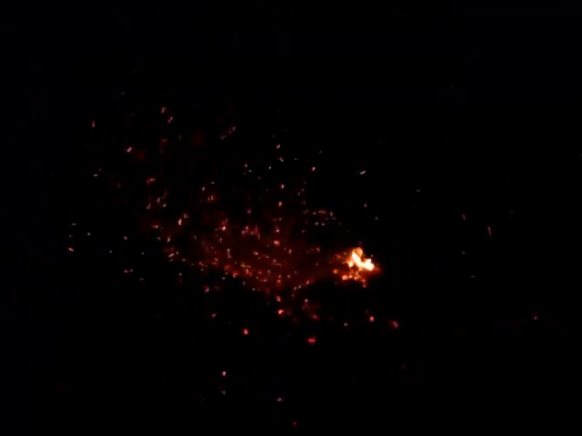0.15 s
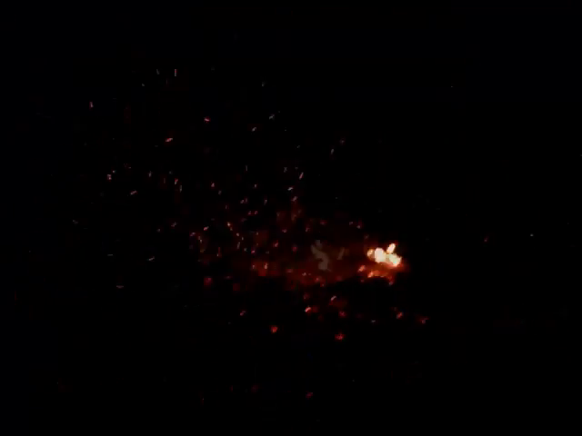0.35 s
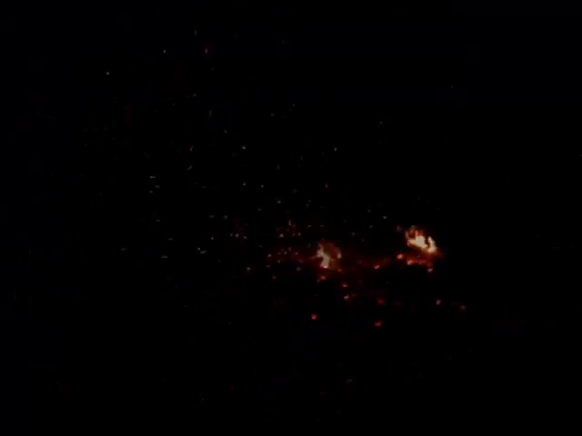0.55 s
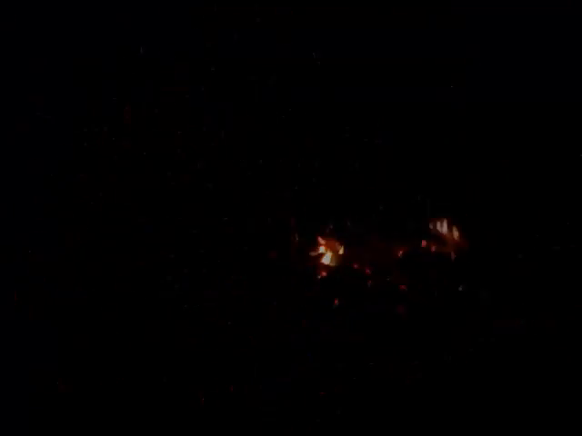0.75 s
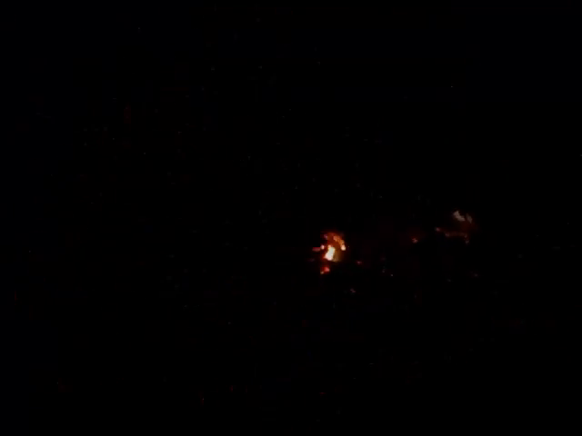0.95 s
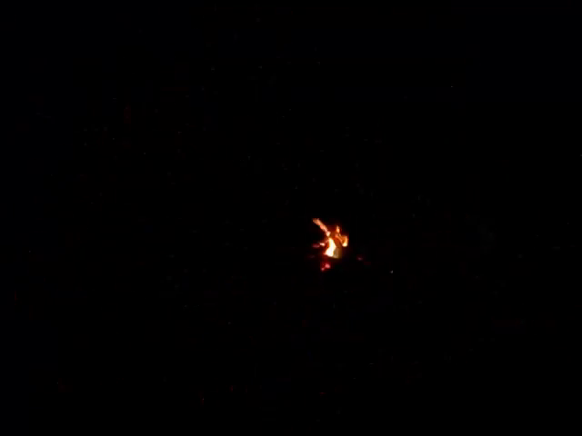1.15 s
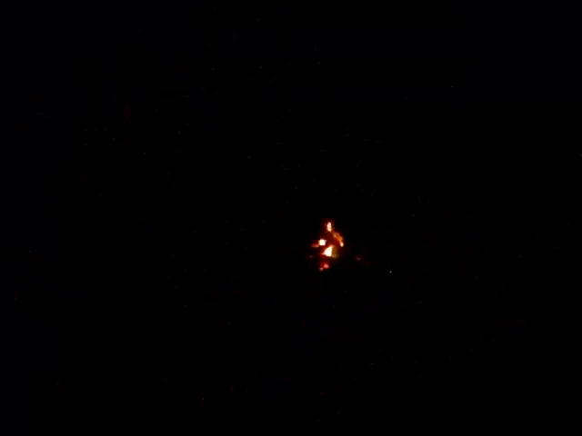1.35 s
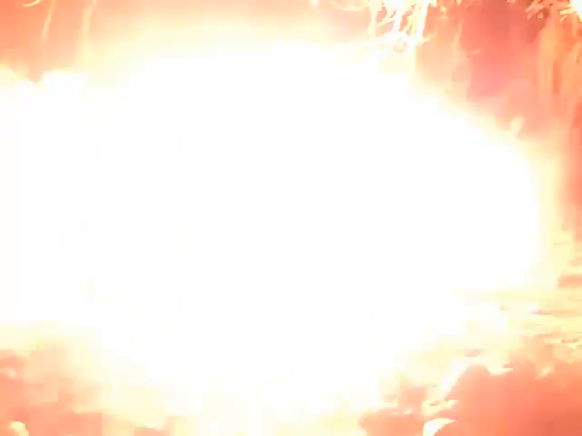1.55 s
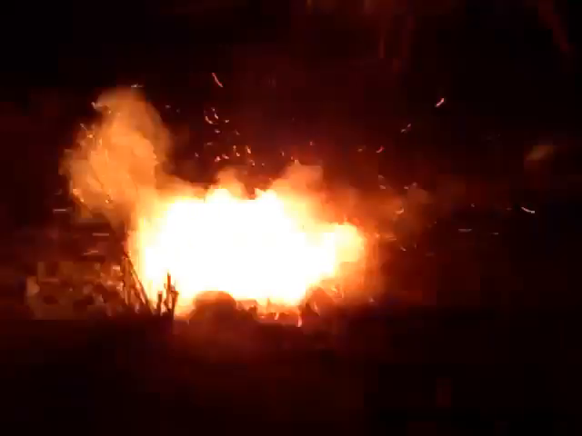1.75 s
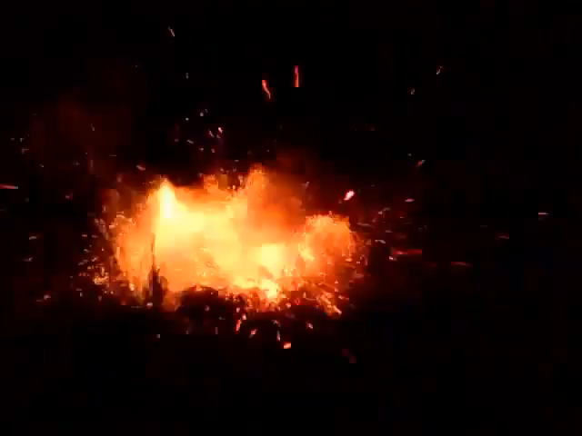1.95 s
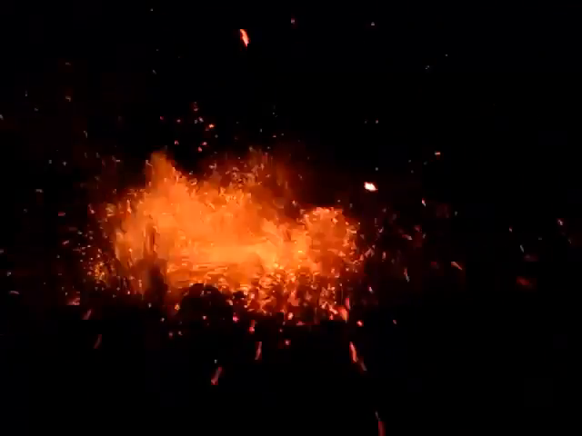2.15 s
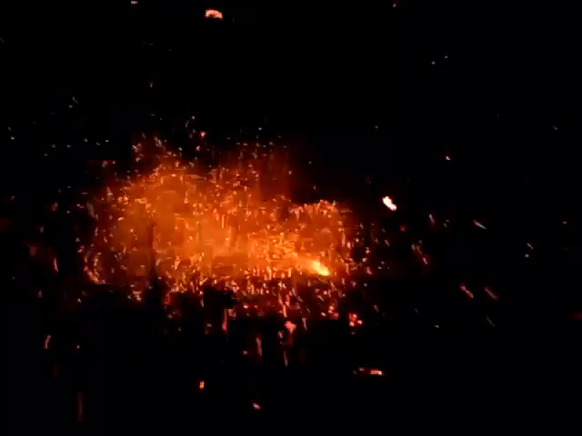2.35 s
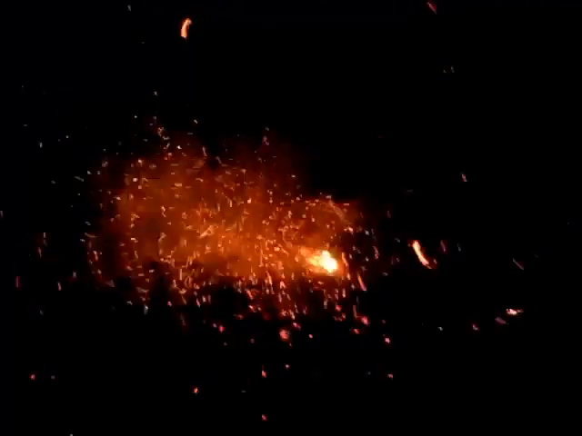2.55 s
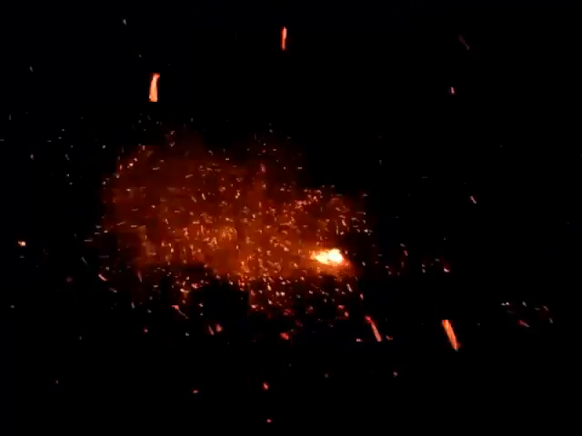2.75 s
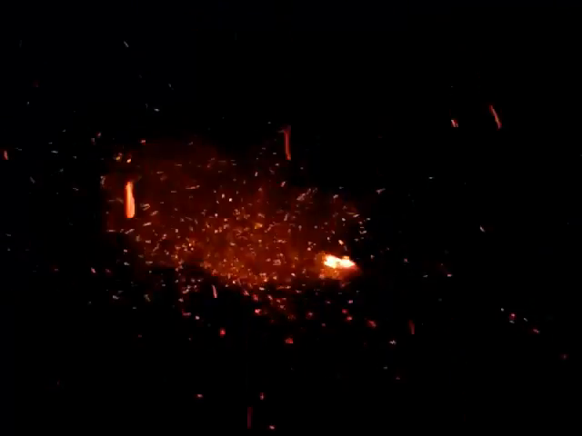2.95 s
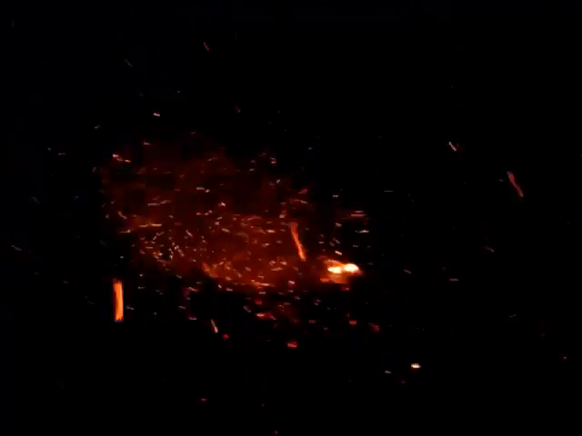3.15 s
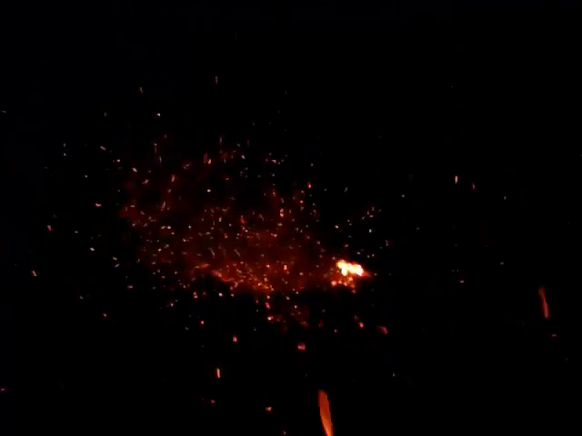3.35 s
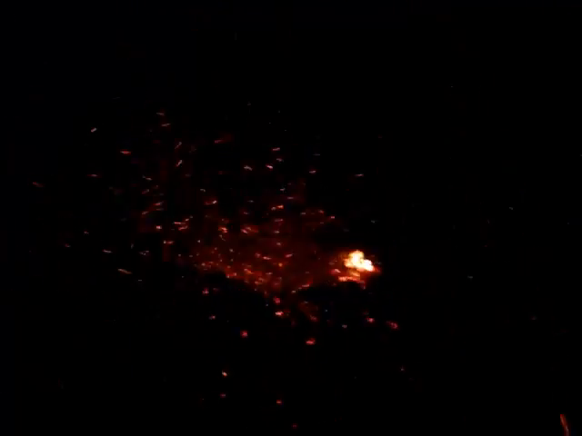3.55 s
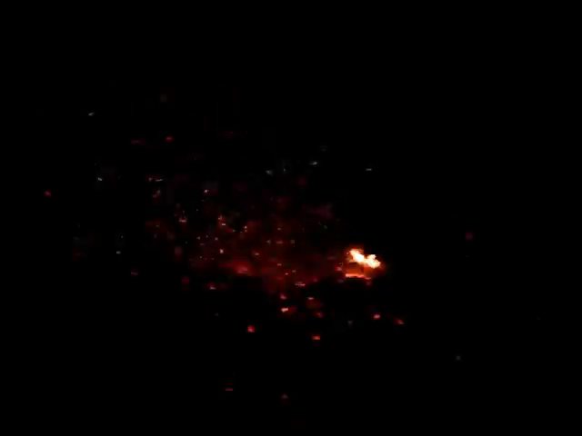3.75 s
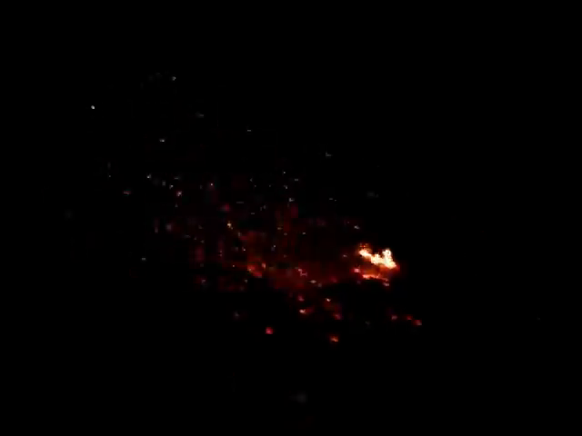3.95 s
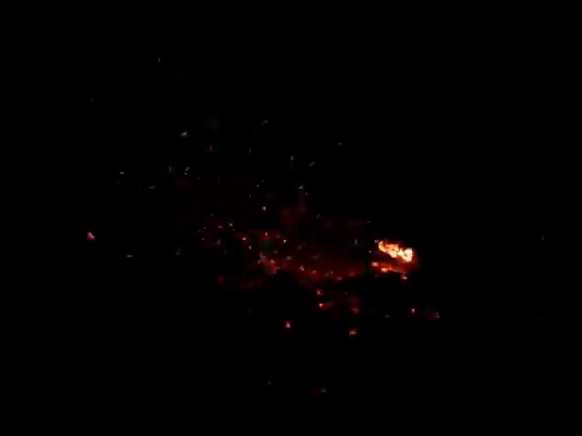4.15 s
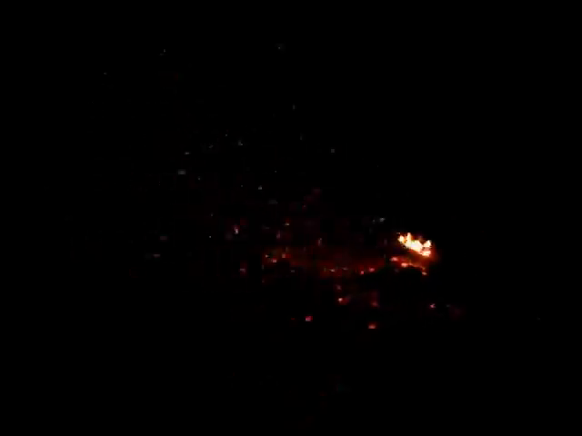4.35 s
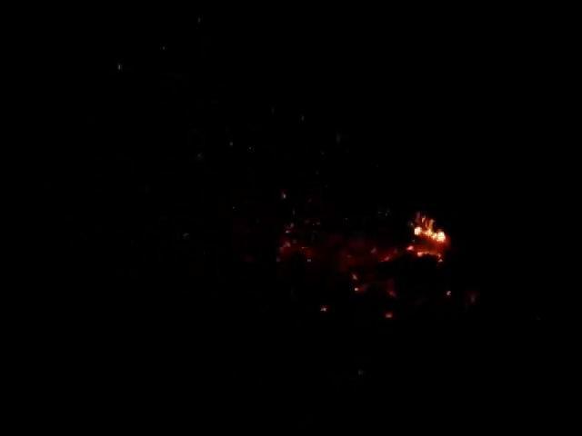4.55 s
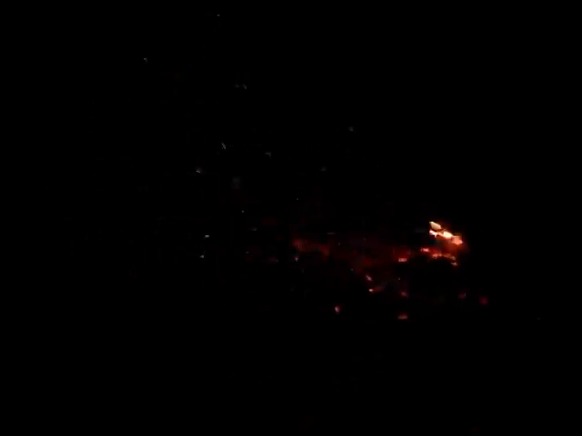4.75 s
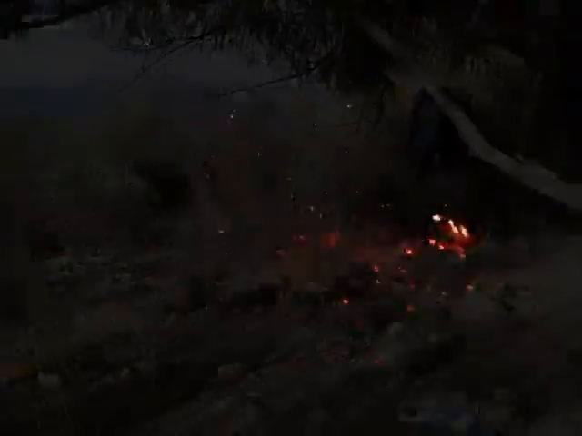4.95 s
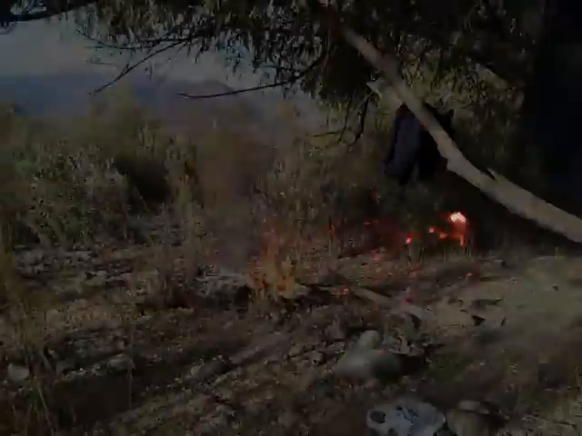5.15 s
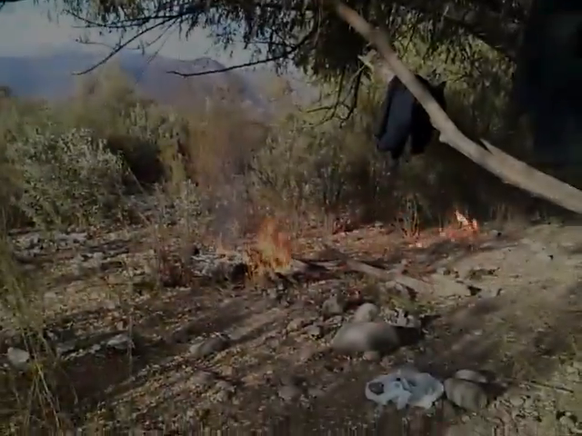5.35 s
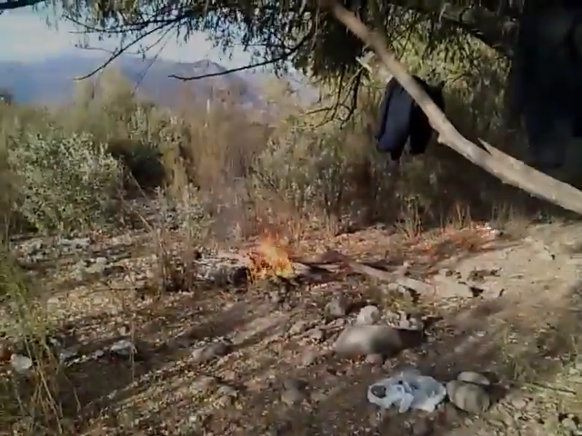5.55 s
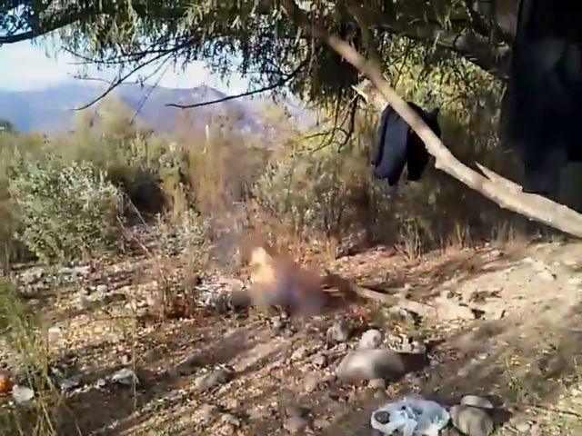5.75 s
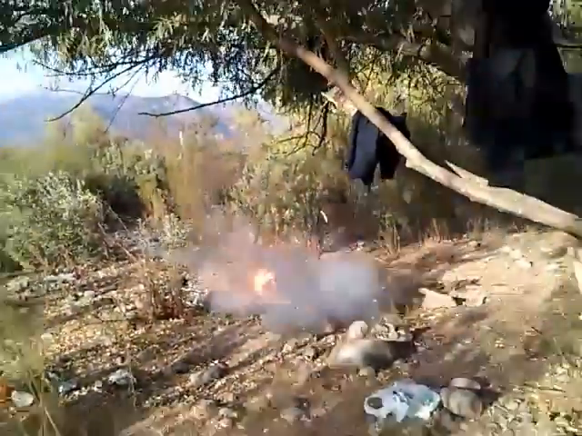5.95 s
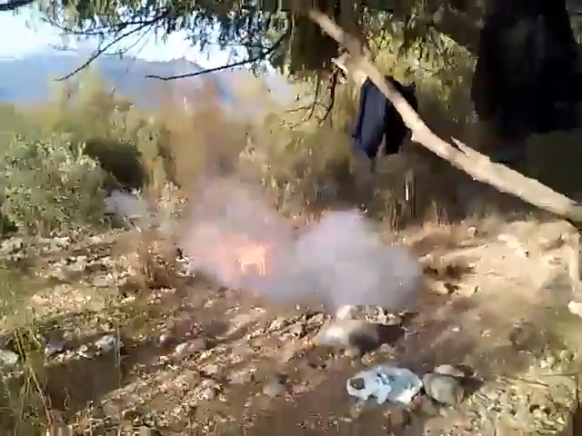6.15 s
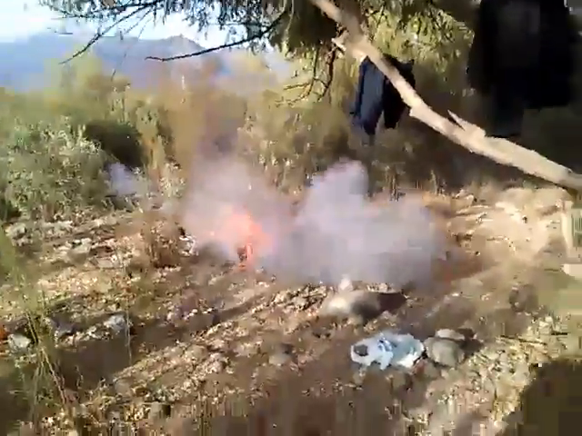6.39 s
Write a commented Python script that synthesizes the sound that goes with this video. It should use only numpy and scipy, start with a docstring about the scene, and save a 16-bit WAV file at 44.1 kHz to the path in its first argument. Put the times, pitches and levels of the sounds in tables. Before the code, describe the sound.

From 0 to 0.75 s, tail-end debris of a blast ticks, knocks and rustles at normal speed over faint air. The sound then turns slowed and dull: quiet air with a few small pops around 0.9-1.2 s. At 1.63 s a massive gas blast hits, hard-clipped by a small microphone, an octave low, with a heavy ground swing sinking in pitch and rolling echoes from ground and hills until about 2.4 s. Loud cracks and hollow knocks cluster at 2.3-2.45 s; the roar decays through sparse landings, brushing rustles and low wind gusts around 3-4.4 s. At 5.38 s it changes to daytime fire hiss with wind and a thin, sinking gas whistle. A pop at 5.82 s precedes a sharp, distorted bang at 5.86 s, shorter and brighter, with quick thumping echoes. A tin clanks on stones from 6.17 s, and a strong crack and clank land near 6.36 s.

```python
"""Two gas blasts in open scrub

Two gas blasts overload a small microphone; hills send them back and debris lands on the ground.
The night blast is drawn at half speed, an octave down; its late debris is first heard at full speed.
The daytime blast follows a hissing fire and throws a tin that clanks on stones.
Shaped noise makes air, fire, wind, scatter and cracks; sine swings make thuds, knocks and ringing tin;
each shock front is one sudden push with a longer suction."""
import sys
import numpy as np
from scipy import signal
from scipy.fft import rfft, irfft, next_fast_len
from scipy.io import wavfile
from scipy.ndimage import uniform_filter1d

SR = 44100
rng = np.random.default_rng(int(sys.argv[2]) if len(sys.argv) > 2 else 0)


def gain_from_db(level_db):
    """Turn a decibel level (scalar or array-like) into a linear amplitude factor."""
    decades = np.asarray(level_db, float) / 20
    return 10 ** decades


def master(y):
    """Save y as 16-bit WAV."""
    cut = np.clip(np.atleast_2d(y).T, -1, 1)
    pcm = np.round(cut * 32767)  # scale
    wavfile.write(sys.argv[1], SR, pcm.astype(np.int16))


N = 283122
TIME = np.arange(N) / SR
# the night and day blasts: (time [s], scatter level [dB])
BLAST_TIMES = [(1.634, 7.5), (5.859, 8.5)]


def unit(x):
    """Scaled to rms 1."""
    return x / np.sqrt(np.mean(x ** 2) + 1e-20)


def along(points, hz):
    """Columns of (frequency, values) rows read on a log frequency axis."""
    f, *columns = np.transpose(points)
    return [np.interp(np.log(hz + 1), np.log(f + 1), c) for c in columns]


def filtered(x, response):
    """x times a response of frequency."""
    m = next_fast_len(len(x) + 8192)
    return irfft(rfft(x, m) * response(np.fft.rfftfreq(m, 1 / SR)), m)[:len(x)]


def resonance(x, hz, width_hz):
    """One causal resonance."""
    return filtered(x, lambda f: 1j * f * width_hz / (hz * hz - f * f + 1j * f * width_hz))


def below(x, top_hz):
    """A steep band limit, fading out over the last 400 Hz."""
    return filtered(x, lambda hz: np.clip((top_hz - hz) / 400, 0, 1))


def add(track, s, sound):
    """Mixes a sound in at time s."""
    part = track[round(s * SR):][:len(sound)]
    part += sound[:len(part)]


def rush(spectrum, patchy_db):
    """Coloured noise of rms 1 with time-frequency patches of random gain."""
    bins = signal.stft(rng.standard_normal(N + 512), nperseg=512)[2]
    patches = uniform_filter1d(rng.standard_normal(bins.shape), size=6, axis=0)
    patches = uniform_filter1d(patches, size=12, axis=1)
    noise = signal.istft(bins * gain_from_db(patchy_db * unit(patches)), nperseg=512)[1][:N]
    return unit(filtered(noise, lambda hz: gain_from_db(along(spectrum, hz)[0])))


def background(hiss_db, spectrum):
    """Steady air or fire hiss over gusts of low wind noise on the microphone port."""
    # wind loudness: (time [s], level [dB])
    gusts = [(.8, -47.5), (1.6, -50.5), (3.2, -41.5), (3.5, -47.5), (3.88, -41), (4.05, -45), (4.75, -48.5),
             (5.38, -45), (5.486, -43.5), (5.6, -42)]
    # wind colour: (frequency [Hz], relative density [dB])
    wind_colour = [(15, -3), (30, 6), (70, -4), (150, -12), (250, -33.5), (500, -120)]
    hiss = gain_from_db(hiss_db) * rush(spectrum, patchy_db=2.0)
    gust_db = np.interp(TIME, *np.transpose(gusts))
    return hiss + gain_from_db(gust_db) * rush(wind_colour, patchy_db=1.0)


def debris():
    """Each popping ember or landing piece gives a tick, a dry crack and a short hollow knock; a faint click at
    the end of the full-speed opening is made the same way."""
    # embers and pieces, plus one faint click (4.758 s, heard as the full-speed opening ends): (time [s], crack
    # level [dB], crack pitch [Hz], knock level [dB], knock pitch [Hz])
    pieces = [(.927, -48, 2380, -44, 600), (.9567, -48, 2520, -41.5, 678), (.993, -37.5, 1330, -40, 440),
              (1.073, -40.5, 1840, -49, 595), (1.181, -43, 902, -46, 434), (2.257, -34, 895, -19.5, 520),
              (2.3111, -17, 2600, -11.5, 250), (2.3221, -19, 1720, -5.5, 242.6),
              (2.3514, -15, 1720, -15.5, 540), (2.36, -15, 1500, -19, 560),
              (2.4219, -30.5, 2900, -24.5, 390), (2.4337, -23, 1720, -20, 199),
              (2.444, -35.5, 1290, -14.5, 543), (2.9023, -37.5, 2450, -39, 221),
              (2.966, -45, 2640, -35, 195), (3.2829, -42.5, 2020, -49, 228),
              (3.3947, -34.5, 1850, -27, 690), (3.7006, -35, 1900, -20.5, 550),
              (3.709, -81, 885, -24, 224.5), (3.72, -38, 940, -21, 193.5), (3.7488, -68, 929, -26, 310),
              (3.773, -49, 1480, -26.5, 250), (3.8225, -33, 910, -22.5, 213),
              (3.8773, -29, 850, -21.5, 241), (3.8919, -47, 870, -20, 245.5),
              (4.0388, -23, 850, -19.5, 594), (4.311, -49, 2030, -54, 600), (4.346, -57, 890, -33.5, 231),
              (4.3984, -61, 902, -34, 168), (4.758, -46, 1190, -53, 600), (5.5463, -40.5, 1280, -53, 212),
              (5.616, -47, 2600, -58, 394), (5.6932, -35, 1990, -37.5, 384),
              (5.8184, -22.5, 3400, -22.5, 690), (6.3547, -2.5, 1132, -13, 805),
              (6.3606, -18, 1200, -6.5, 790), (6.3663, -27, 1590, -12, 480)]
    knock_ref_hz, ref_t60_s, small_dies = 250, 0.097, 0.98  # smaller, higher pieces ring shorter
    tick_db = -22.5  # relative to the crack
    blow_gain, blow_t60_s = 0.68, 0.0027  # the sharp start of the crack
    out, t = np.zeros(N), TIME[:SR // 4]
    for s, crack_db, crack_hz, knock_db, knock_hz in pieces:
        grit, chips, body = rng.standard_normal((3, len(t)))
        t60 = ref_t60_s * (knock_ref_hz / knock_hz) ** small_dies

        crack = resonance(chips, crack_hz, width_hz=0.55 * crack_hz)
        crack = unit(resonance(crack, crack_hz, width_hz=0.63 * crack_hz))
        tick = unit(resonance(grit, 2.2 * crack_hz, width_hz=1.3 * crack_hz))
        snap = blow_gain * gain_from_db(-60 * t / blow_t60_s)
        snap += gain_from_db(-60 * t / (0.36 * t60))
        snap += 0.12 * gain_from_db(-60 * t / (4.86 * t60))

        hollow = np.clip(knock_ref_hz / knock_hz, 0, 1) ** 1.2  # big hollow pieces ring, small ones thud
        thud = resonance(body, knock_hz, width_hz=0.65 * knock_hz)
        thud = unit(resonance(thud, knock_hz, width_hz=2.16 * knock_hz))
        knock = hollow * np.sin(2 * np.pi * knock_hz * t) + (0.8 - 0.28 * hollow) * thud
        soft = gain_from_db(-60 * t / t60) * (1 - np.exp(-t / 0.0014))

        add(out, s, gain_from_db(crack_db) * snap * (crack + gain_from_db(tick_db) * tick))
        add(out, s, gain_from_db(knock_db) * soft * knock)
    return out


def scuffle():
    """Clumped rustle that swells and fades while loose pieces slide through dry growth."""
    # slides: (start [s], length [s], rustle level [dB], dry leaf level [dB])
    slides = [(2.673, 0.16, -39, -55), (3.088, 0.1, -47.5, -56), (3.683, 0.079, -39.5, -59),
              (3.748, 0.11, -41.5, -68), (3.871, 0.051, -37, -58.5)]
    # rustle colour: (frequency [Hz], relative density [dB])
    brush_colour = [(300, 7), (600, 5.5), (1300, -10), (1800, -3.5), (2300, -5.5), (2800, -13), (5500, -46)]
    # dry leaf colour: (frequency [Hz], relative density [dB])
    leaf_colour = [(2000, -28), (3000, -7), (4300, -2), (5500, -17), (10000, -20)]
    peak_share, ends_db = 0.61, -3.5  # where in the slide it is loudest; both ends relative to that
    levels = np.zeros((2, N))
    for s, length, *dbs in slides:
        progress = (TIME - s) / length
        slide_db = np.interp(progress, [0, peak_share, 1], [ends_db, 0, ends_db], left=-120, right=-120)
        levels += gain_from_db(np.add.outer(dbs, slide_db))
    clumps = gain_from_db(3 * unit(uniform_filter1d(rng.standard_normal(N), size=300)))
    noise = [unit(clumps * rush(colour, patchy_db=-1.0)) for colour in (brush_colour, leaf_colour)]
    return (uniform_filter1d(levels, size=400) * noise).sum(axis=0)


def whine():
    """A faint thin whine: one steady sine."""
    return gain_from_db(-79) * np.sin(2 * np.pi * 7950 * TIME)


def blast(row, field):
    """Near and far scatter builds up behind the front and dies band by band."""
    s, field_db = row
    hz, t, bins = signal.stft(rng.standard_normal(N + 1024), SR, nperseg=1024)
    near_db, near_t60, far_db, far_t60 = (c[:, None] for c in along(field, hz))
    gain = np.hypot(gain_from_db(near_db - 60 * t / near_t60), gain_from_db(far_db - 60 * t / far_t60))
    scatter = signal.istft(bins * gain, SR, nperseg=1024)[1][:N]
    scatter = scatter / np.std(scatter[:SR // 20])  # level set by the first 50 ms
    scatter *= 1 - np.exp(-(TIME / .011) ** 2)
    out = np.zeros(N)
    add(out, s, gain_from_db(field_db) * scatter)
    return out


def shocks():
    """Each front is a sudden push and a longer suction; the microphone inverts it."""
    # fronts, the last one a second puff of gas: (time [s], push level [dB], push length [s])
    fronts = [(1.6345, 28, .0036), (5.8588, 26, .0013), (5.8628, 15, .011)]
    out = np.zeros(N)
    for s, push_db, length in fronts:
        u = TIME[:SR // 4] / length
        add(out, s, -gain_from_db(push_db) * (1 - u) * np.exp(-u))
    return out


def heave():
    """The ground heaves after the night blast: a heavy, uneven swing whose pitch sinks."""
    first_hz, last_hz, sink_s = 100, 22, .055
    attack_s, hold_s, fade_db_per_s = .035, .075, 240
    t = np.maximum(TIME - 1.645, 0)
    hz = last_hz + (first_hz - last_hz) * np.exp(-t / sink_s)
    uneven = unit(uniform_filter1d(uniform_filter1d(rng.standard_normal(N), size=500), size=300))
    swing = np.sin(2 * np.pi * np.cumsum(hz) / SR + uneven)
    fade_db = fade_db_per_s * np.maximum(t - attack_s - hold_s, 0)
    return gain_from_db(9.5 - fade_db) * np.minimum(t / attack_s, 1) ** 2 * swing


def echoes():
    """Ground and hillsides each return a few low, uneven swings under a dull rush."""
    # returns: (time [s], thud level [dB], thud pitch [Hz], rush level [dB], t60 [s])
    returns = [(1.789, -11, 60, -31, .36), (2.021, -10, 84.6, -35, 0.26), (2.081, -15, 92, -39, 0.033),
               (2.112, -24.5, 135, -34, 0.44), (2.31, -8.5, 64.7, -45, 0.085),
               (5.927, -15, 21.1, -54, 0.42), (5.984, -31, 250, -20.5, 0.059),
               (6.037, -22.5, 94.3, -29.5, 0.35), (6.051, -7.5, 181.5, -22.5, 0.055),
               (6.095, -25, 196, -24, 0.089), (6.315, -16, 44.2, -51, 0.076)]
    # deep thuds carry a bright rush, higher ones a duller one
    bright_hz, deep_hz, dulling = 1960, 95, 2.08
    out, t = np.zeros(N), TIME[:SR // 2]
    for s, thud_db, thud_hz, rush_db, t60 in returns:
        swell = (1 - np.exp(-(t / (0.075 * t60)) ** 2)) * gain_from_db(-60 * t / t60)
        uneven = .7 * unit(uniform_filter1d(rng.standard_normal(len(t)), size=round(SR / thud_hz)))
        thud = np.sin(2 * np.pi * thud_hz * t + uneven)
        hz = bright_hz * min(1, deep_hz / thud_hz) ** dulling
        hiss = resonance(rng.standard_normal(len(t)), hz, width_hz=hz)
        hiss = resonance(hiss, hz, width_hz=2.3 * hz)
        hiss = unit(filtered(hiss, lambda f: 1 / (1 + (f / (2.23 * hz)) ** 4)))
        add(out, s, swell / swell.max() * (gain_from_db(thud_db) * thud + gain_from_db(rush_db) * hiss))
    return out


def fizz():
    """A jet of gas whistles as two narrow noise bands, the lower one sinking as the pressure drops."""
    # spurts: (peak time [s], lower band level [dB], upper band level [dB], rise [s], fade [dB/s])
    spurts = [(5.467, -46, -56.5, 0.12, 22), (5.766, -55, -57, .012, 280), (5.818, -50, -45, 0.0046, 600)]
    lower_hz, sag_hz_per_s, upper_hz = 5500, 1300, 8350
    rise_db = 19  # climb during the rise time
    levels = np.zeros((2, N))
    for s, lower_db, upper_db, rise, fade_db in spurts:
        late = TIME - s
        spurt_db = np.where(late < 0, rise_db * late / rise, -fade_db * late)
        levels += gain_from_db(np.add.outer([lower_db, upper_db], spurt_db))
    # slow noise on each whistle spreads it into a narrow band
    flutter = [unit(filtered(rng.standard_normal(N), lambda f: 1 / (1 + (f / width_hz) ** 2)))
               for width_hz in (280, 800)]
    sinking_hz = lower_hz - sag_hz_per_s * np.maximum(TIME - spurts[0][0], 0)
    tones = np.sin(2 * np.pi * np.array([np.cumsum(sinking_hz) / SR, upper_hz * TIME]))
    return (levels * flutter * tones).sum(axis=0) * (TIME < BLAST_TIMES[1][0])  # ends at the day blast


def tin():
    """Each contact favours the modes near one pitch; the dented wall makes them waver."""
    # modes of the tin: (pitch [Hz], relative level [dB], t60 [s])
    tin_modes = [(480, 5, 0.074), (678, -2, 0.19), (1585, 3, 0.11), (2600, -7.5, 0.14), (3700, 1, 0.052),
                 (4710, -6, 0.12), (5560, -18, 0.15), (6070, -5, 0.15), (7250, -6, 0.055),
                 (8600, -3, 0.083)]
    # contacts with stones: (time [s], level [dB], pitch struck hardest [Hz])
    clanks = [(6.173, -16.5, 970), (6.186, -42, 1500), (6.209, -43, 5500), (6.3, -30.5, 7650),
              (6.323, -28.5, 6800), (6.368, -16, 1500), (6.39, -22, 3020)]
    out, t = np.zeros(N), TIME[:SR // 4]
    hz, mode_db, t60 = np.transpose(tin_modes)[:, :, None]
    for s, db, struck_hz in clanks:
        spread_db = 2.5 * rng.standard_normal(hz.shape) - 3.3 * np.log2(hz / struck_hz) ** 2
        waver = unit(uniform_filter1d(rng.standard_normal((2, len(tin_modes), len(t))), size=330))
        phase_waver = .65 * np.sqrt(hz / 2000) * waver[1]
        modes = (1 + .5 * waver[0]) * np.sin(2 * np.pi * hz * t + phase_waver)
        ring = (gain_from_db(mode_db + spread_db - 60 * t / t60) * modes).sum(axis=0)
        ring *= 1 - np.exp(-t / 0.0038)
        tick = unit(resonance(rng.standard_normal(len(t)), struck_hz, width_hz=0.5 * struck_hz))
        tick *= 0.31 * gain_from_db(-60 * t / 0.036)
        add(out, s, gain_from_db(db) * (ring + tick))
    return out


def overload(x):
    """The microphone's input stage clips hard, a little earlier on the negative side."""
    return np.clip(x, -.93, 1.0)


def scene():
    """Full-speed debris, the slowed night blast, then the daytime blast."""
    # scatter by band: (frequency [Hz], near level [relative dB], near t60 [s],
    # far level [relative dB], far t60 [s])
    night_field = [(24.93, -9, 1, -29.5, 6.64), (60, -8, 0.86, -27, 5.2), (156, 2.5, .4, -26, 2.4),
                   (490, -6, 0.34, -45.5, 3.4), (1500, -9.5, 0.24, -43.5, 1.8),
                   (2614, -16.5, 0.29, -42.5, 1.32), (4400, -25.5, 0.29, -54, 1.26),
                   (5500, -23, 0.11, -68.5, 0.3), (8660, -37.5, 0.27, -60, 0.37)]
    day_field = [(25, -21, 0.13, -55, 0.98), (75, -16.5, 0.22, -26, 2.95), (311, 5.5, 0.15, -25.5, 1.2),
                 (917, -3, 0.15, -32, 1.1), (2485, -19, 0.19, -40.5, 1.16),
                 (6100, -17.5, 0.25, -41.5, 0.91), (13700, -34.5, 0.18, -74, 1.46)]
    # hiss colours: (frequency [Hz], relative density [dB])
    night_air = [(88, -35.5), (150, 1.5), (334, -0.5), (436, -2.5), (611, 0.5), (1040, -9.5), (1540, -11.5),
                 (2240, -16.5), (8190, -29), (10500, -33), (13600, -41), (22000, -120)]
    fire_colour = [(90, -27), (150, -2), (250, -6), (390, -2.5), (550, -11.5), (1000, -9.5), (2200, -12),
                   (2800, -17.5), (4000, -11.5), (6500, -20), (10000, -34), (16000, -32)]
    slow_from_s, slow_to_s, replay_from_s = .755, 5.377, 3.254
    slow_top_hz, top_hz = 10560, 15800

    shared = shocks() + echoes() + debris()
    night = shared + heave() + scuffle() + whine()
    night += blast(BLAST_TIMES[0], night_field) + background(-49, night_air)
    night = below(overload(night), slow_top_hz)  # the band limit rounds the clipped edges

    day = shared + tin() + fizz()
    day += blast(BLAST_TIMES[1], day_field) + background(-45.7, fire_colour)
    day = below(overload(day), top_hz)

    out = np.where(TIME < slow_to_s, night, day)
    opening = round(slow_from_s * SR)
    full_speed = night[round(replay_from_s * SR)::2]  # every second sample: double the slowed speed
    out[:opening] = below(full_speed[:opening], top_hz)
    return out[None]


def band_limit(x):
    """A steep low-pass at the top of the band."""
    return signal.sosfilt(signal.butter(12, 16300, fs=SR, output="sos"), x)


def record(dry):
    """The finished mix passes the hard-clipping input stage."""
    mix = overload(dry)
    return band_limit(mix)


dry = scene()
out = record(dry)
master(out)
```